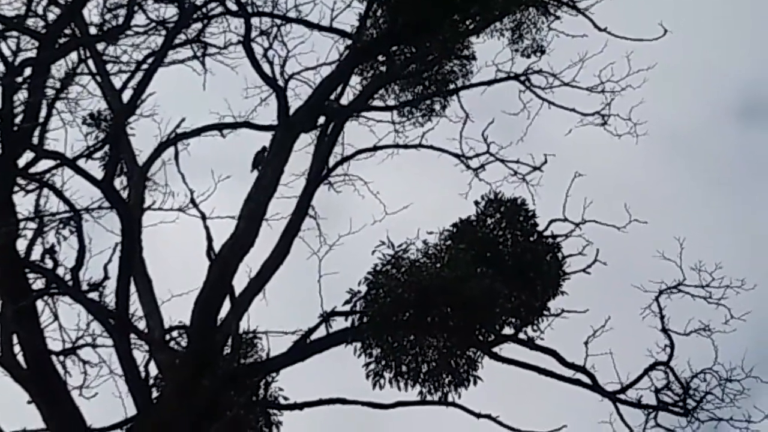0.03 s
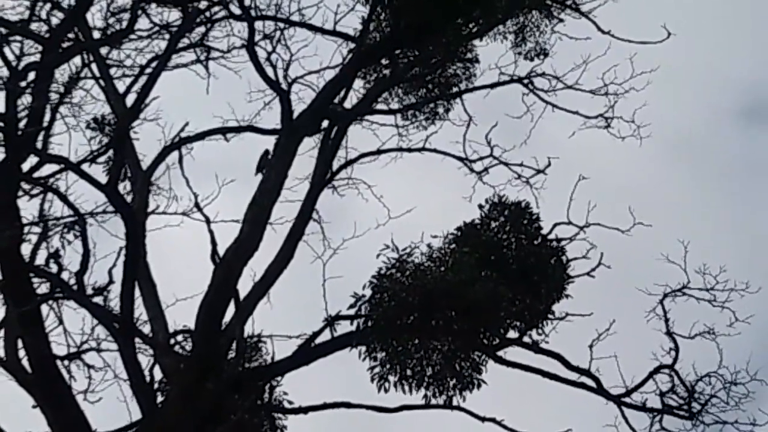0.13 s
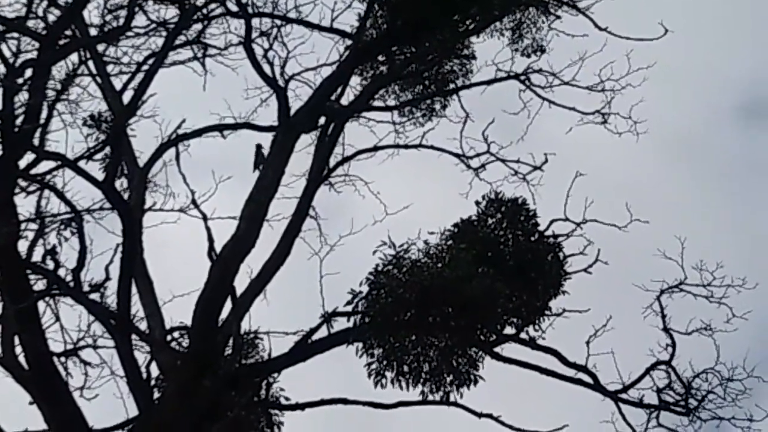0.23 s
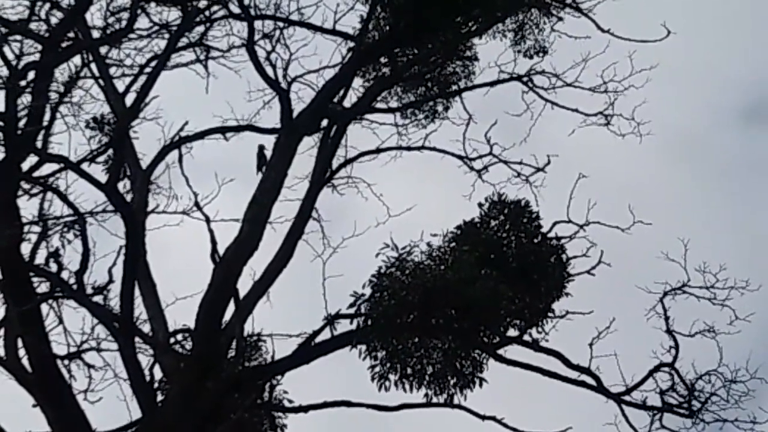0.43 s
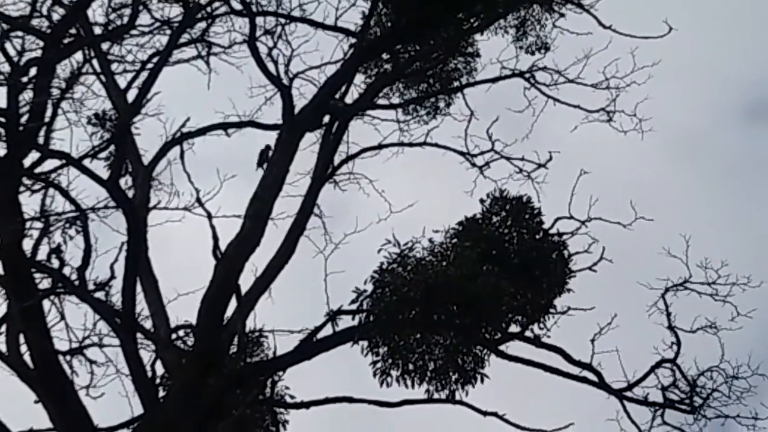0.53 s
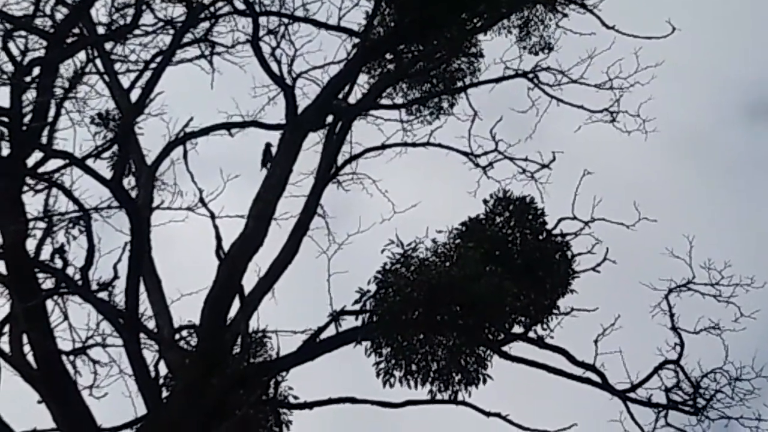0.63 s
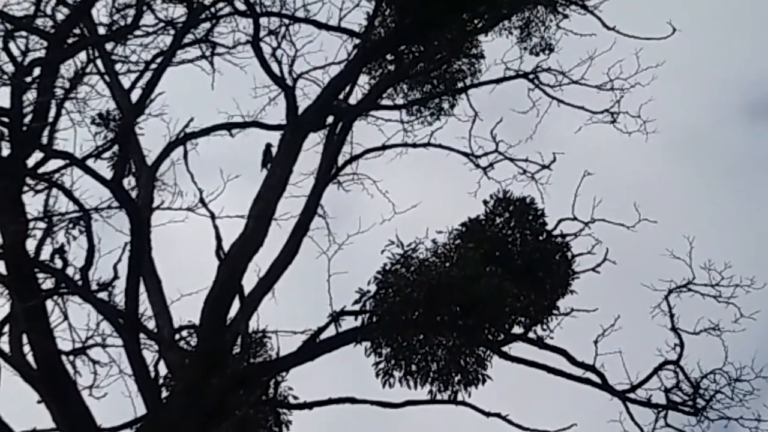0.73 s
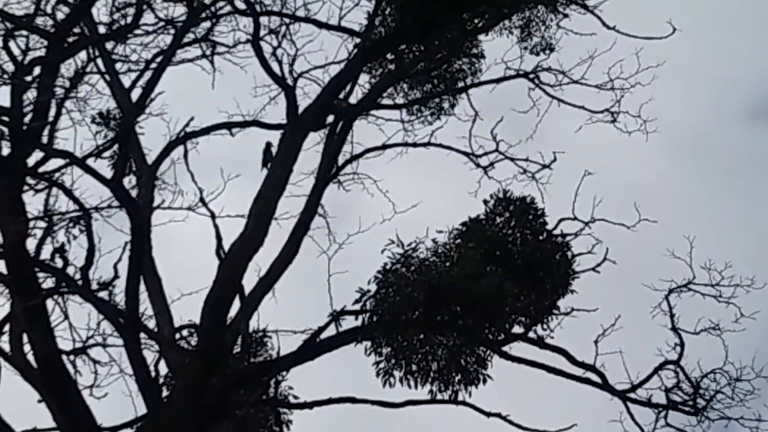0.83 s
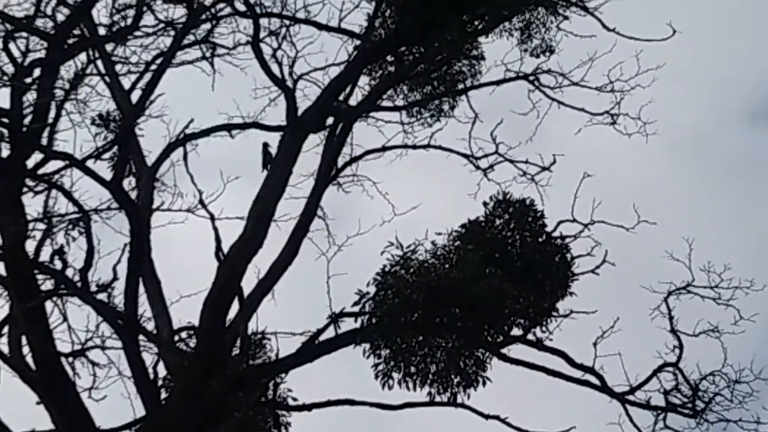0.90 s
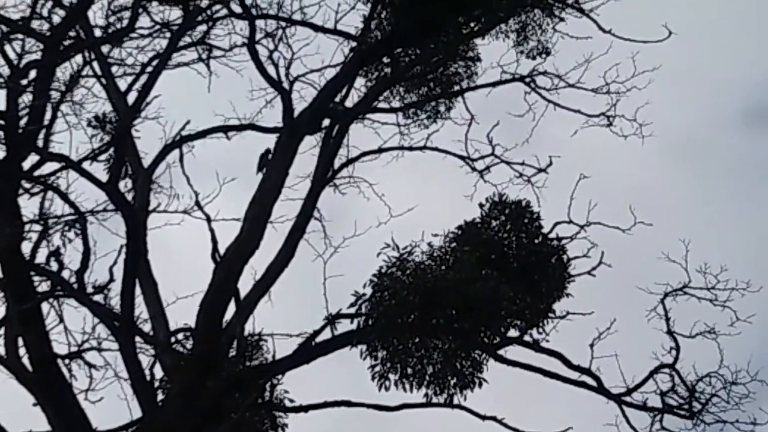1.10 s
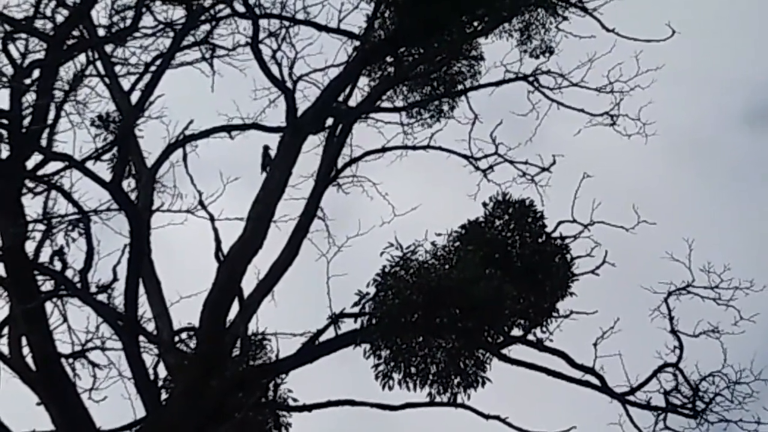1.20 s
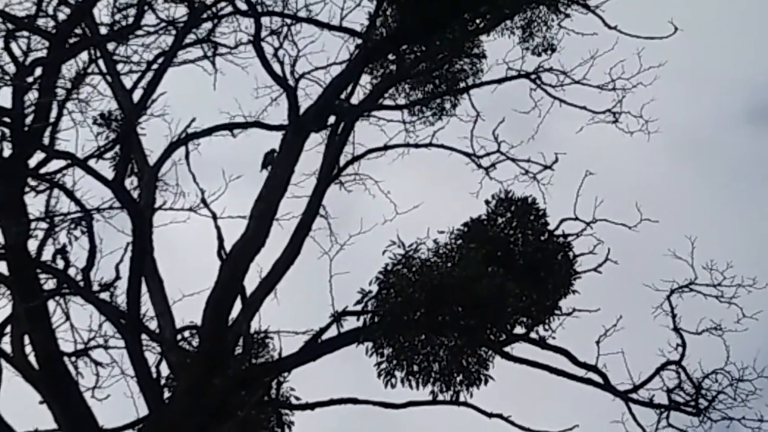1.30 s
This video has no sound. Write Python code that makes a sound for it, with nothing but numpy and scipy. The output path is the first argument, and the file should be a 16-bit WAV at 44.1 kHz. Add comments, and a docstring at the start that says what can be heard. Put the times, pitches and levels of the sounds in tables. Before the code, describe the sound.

Harsh bird chatter comes from high in a tree, starting just after a hard gust buffets the microphone. Weaker gusts keep rumbling over the notes, and thin, far chirps echo lightly among the trees.

```python
"""Over a distant outdoor wash and faint hiss, wind eddies buffet the microphone, once hard near 0.25 s.
With that gust a small, far bird begins its thin, arched chirps. From about 0.3 s a bird high in a bare
tree gives a harsh chatter, pulses and breath filtered by its throat: twelve rasping notes that slow
down and grow louder to the end. Both birds echo among the trees while weaker gusts rumble on."""
import sys
import numpy as np
from scipy import signal
from scipy.fft import rfft, irfft, next_fast_len
from scipy.io import wavfile
from scipy.ndimage import uniform_filter1d, map_coordinates

SR = 44100
rng = np.random.default_rng(int(sys.argv[2]) if len(sys.argv) > 2 else 0)


def transcribe(signal):
    """Save signal, clipped to [-1, 1], as a 16-bit WAV file at the path in sys.argv[1]."""
    frames = np.atleast_2d(signal).T
    limited = np.clip(frames, -1, 1)
    pcm = np.round(limited * 32767).astype(np.int16)
    wavfile.write(sys.argv[1], SR, pcm)


N = 59535


def amp(db):
    """Decibels to amplitude ratio."""
    return 10 ** (np.asarray(db) / 20)


def unit(x):
    """Normalisation to rms 1."""
    return x / np.sqrt(np.mean(x ** 2) + 1e-20)


def clock():
    """The time of each sample in seconds."""
    return np.arange(N) / SR


def along(points, hz):
    """Interpolation of (frequency_hz, value) points on a logarithmic frequency axis."""
    knots_hz, values = np.transpose(points)
    return np.interp(np.log(hz + 1), np.log(knots_hz + 1), values)


def wobble(rate):
    """A smooth random curve with `rate` knots a second."""
    return map_coordinates(rng.standard_normal(N // 8), [clock() * rate], mode="wrap")


def filtered(x, response):
    """Linear filtering: the spectrum of x times a frequency response."""
    size = next_fast_len(N + SR // 2)
    return irfft(rfft(x, size) * response(np.fft.rfftfreq(size, 1 / SR)), size)[:N]


def noise(spectrum):
    """Spectral shaping: white noise coloured and scaled to rms 1."""
    return unit(filtered(rng.standard_normal(N), lambda hz: amp(along(spectrum, hz))))


def evened(x, size=1500):
    """Division by the running rms over `size` samples removes the chance swells of noise."""
    envelope_power = uniform_filter1d(np.abs(signal.hilbert(x)) ** 2, size)
    return x / np.sqrt(np.abs(envelope_power) / 2 + 1e-9)


def chatter():
    """Source and filter: irregular pulses and breath noise excite three throat resonances."""
    # rasping notes: middle_s, level_db, upper_resonance_hz
    notes = [(.336, -61.5, 2240), (0.406, -56, 3230), (0.48, -55.5, 3262), (0.56, -55.5, 3170),
             (0.642, -54, 3090), (.731, -53.5, 3150), (0.829, -53.5, 3116), (0.932, -53, 2980),
             (1.036, -52, 3040), (1.148, -52, 3000), (1.256, -52.5, 2990), (1.366, -49, 3240)]
    # the two fixed throat resonances: centre_hz, width_hz, gain_db
    throat_modes = [(1660, 480, -4), (2375, 335, 2.2)]
    # spectral envelope of the voice: frequency_hz, gain_db
    voice_band = [(400, -43.5), (1000, -18), (1400, 3), (3300, -3), (3550, -4), (4400, -11), (5600, -11.5),
                  (7000, -26), (12000, -40)]
    pulse_hz, jitter, breath_share = 415, .3, .6
    flank_s, lengthen_per_s = .014, .35  # later notes last longer
    flutter_hz, flutter_db = 115, -.5
    upper_width_hz, upper_db = 235, -.5
    t, out = clock(), np.zeros(N)
    cycles = np.floor(np.cumsum(pulse_hz * np.exp(jitter * wobble(pulse_hz))) / SR)
    pulses = unit(np.diff(cycles, prepend=0))
    rasp = np.sqrt(1 - breath_share) * pulses + np.sqrt(breath_share) * rng.standard_normal(N)
    for middle_s, db, upper_hz in notes:
        modes = list(throat_modes) + [(upper_hz, upper_width_hz, upper_db)]

        def throat(f):
            """The resonances add in power under the voice's spectral envelope."""
            power = sum(amp(gain_db) ** 2 / (1 + 2 * ((f - hz) / width_hz) ** 2) ** 2
                        for hz, width_hz, gain_db in modes)
            return amp(along(voice_band, f)) * np.sqrt(power)

        width_s = flank_s * (1 + lengthen_per_s * (middle_s - notes[0][0]))
        swell = np.exp(-((t - middle_s) / width_s) ** 2 / 2)
        flutter_phase = 2 * np.pi * flutter_hz * (t - middle_s) + rng.uniform(0, 2 * np.pi)
        flutter = amp(flutter_db * np.cos(flutter_phase))
        out += amp(db) * swell * flutter * evened(unit(filtered(rasp, throat)))
    return out


def chirps():
    """Modulation by low-pass noise spreads each gliding whistle into a hoarse, narrow band."""
    # the small bird's glides: middle_s, length_s, start_hz, end_hz, level_db
    glides = [(0.262, 0.063, 3220, 3040, -74.5), (0.424, .06, 4000, 3430, -71),
              (0.631, 0.046, 5400, 5350, -77), (0.792, 0.066, 4500, 5430, -79),
              (0.831, 0.039, 3900, 3370, -65), (1.064, 0.068, 3716, 4570, -78.5),
              (1.108, 0.051, 4040, 3414, -67.5), (1.294, 0.08, 3870, 4800, -72),
              (1.327, 0.058, 4030, 3500, -68)]
    arch_hz, spread_hz = 120, 300
    t, out = clock(), np.zeros(N)
    for middle_s, length_s, start_hz, end_hz, db in glides:
        progress = np.clip((t - middle_s) / length_s + .5, 0, 1)
        arch = np.sin(np.pi * progress)
        pitch_hz = start_hz + (end_hz - start_hz) * progress + arch_hz * arch
        hoarse = unit(filtered(rng.standard_normal(N), lambda f: np.exp(-(f / spread_hz) ** 2 / 2)))
        out += amp(db) * arch * hoarse * np.sin(2 * np.pi * np.cumsum(pitch_hz) / SR)
    return out


def tree_echo(x):
    """Reverberation: scattering from trunks and branches leaves an exponentially decaying tail."""
    # time to decay by 60 dB: frequency_hz, decay_s
    decay_times = [(200, .5), (2500, 1), (8000, 0.9)]
    hz, t, spectra = signal.stft(rng.standard_normal(SR), SR, nperseg=256)
    decay = amp(-60 * t / along(decay_times, hz)[:, None])
    tail = signal.istft(spectra * decay, SR, nperseg=256)[1]
    return signal.fftconvolve(x, tail / np.linalg.norm(tail))[:N]


def wind():
    """Turbulence: the rumble rises in pitch as eddies pass faster; a finer swirl leads strong gusts."""
    # course of the wind: time_s, strength_db, rumble_centre_hz
    gusts = [(0, -46, 104), (0.096, -33, 104.8), (.13, -46.5, 120.6), (.178, -32, 80.13),
             (.205, -39, 114.1), (0.227, -20.5, 175), (0.271, -21.5, 91.9), (.315, -37.5, 79.1),
             (0.349, -28, 89.4), (0.388, -37.5, 99.17), (0.462, -40.5, 104.1), (0.526, -31.5, 85.16),
             (0.587, -45.5, 95.1), (0.62, -25, 76.4), (0.722, -48, 83.68), (0.798, -45, 95.6),
             (0.833, -41.5, 113.3), (.875, -37, 105.1), (.96, -29, 108.5), (1.052, -49, 90.45),
             (1.10, -36.5, 114.5), (1.13, -40.5, 101.3), (1.175, -34.5, 79.64), (1.235, -42.5, 78),
             (1.35, -44, 110.8)]
    # large eddies at the mean speed: frequency_hz, density_db
    rumble_spectrum = [(25, -35), (45, -4.5), (70, 5), (100, 3.5), (140, -3.5), (200, -17), (280, -26.5),
                       (450, -53), (1000, -86.5)]
    # finer eddies: frequency_hz, density_db
    swirl_spectrum = [(60, -16), (150, 15), (240, -3), (320, -18.5), (500, -17.5), (750, -21.5),
                      (1100, -38), (2500, -82.5)]
    swirl_offset_db, swirl_growth, swirl_lead_s = -15.5, 1.59, .0059
    times_s, db, centre_hz = np.transpose(gusts)
    strength_db = np.interp(clock(), times_s, db)
    front_db = np.interp(clock() + swirl_lead_s, times_s, db)
    relative_speed = np.interp(clock(), times_s, centre_hz) / centre_hz.mean()
    eddies = evened(noise(rumble_spectrum), size=900)
    rumble = map_coordinates(eddies, [np.cumsum(relative_speed)], mode="mirror")
    swirl = evened(noise(swirl_spectrum), size=900)
    swirl_db = swirl_offset_db + db.mean() + swirl_growth * (front_db - db.mean())
    return amp(strength_db) * rumble + amp(swirl_db) * swirl


def eddy_thumps():
    """Single eddies land as dull pressure pulses, high-pass filtered by the microphone port."""
    # eddy impacts: time_s, peak_db, half_width_s
    impacts = [(0.2228, -20, 0.00078), (0.2365, -9, 0.0012), (0.2551, -6.5, 0.0023), (0.516, -35, .0012),
               (0.622, -24.5, 0.0019), (0.635, -29.5, 0.0017), (.680, -25.5, 0.0027), (.896, -26.5, 0.0019),
               (0.915, -28.5, 0.0016), (0.947, -28, 0.0024), (0.963, -21.5, 0.0022), (1.078, -29, 0.0024),
               (1.106, -24.5, 0.0029), (1.31, -31.5, .0015)]
    port_hz = 85
    port = signal.butter(3, port_hz, "high", fs=SR, output="sos")
    out = np.zeros(N)
    for time_s, db, half_width_s in impacts:
        pressure = 1 / (1 + ((clock() - time_s) / half_width_s) ** 2)
        thump = signal.sosfilt(port, pressure)
        out -= amp(db) * thump / np.abs(thump).max()
    return out


def background():
    """Noise floor: a slowly rising, distant outdoor wash and the microphone's steady self-noise."""
    # colour of the wash: frequency_hz, density_db
    wash_spectrum = [(100, -15), (400, -7.5), (700, -2), (1050, -3.5), (1500, -8.5), (2300, -17),
                     (3200, -28), (5000, -31.5), (9000, -47.5)]
    # rise of the wash: time_s, level_db
    wash_levels = [(0, -61.5), (.4, -58.5), (0.999, -57.5), (1.35, -57)]
    # colour of the self-noise: frequency_hz, density_db
    hiss_spectrum = [(1000, -1), (4500, -10), (6500, -4), (8000, -1.5), (10000, 0.5), (15500, -0.5)]
    hiss_db = -70
    wash_db = np.interp(clock(), *np.transpose(wash_levels))
    return amp(wash_db) * noise(wash_spectrum) + amp(hiss_db) * noise(hiss_spectrum)


def scene():
    """Superposition of both birds, their echoes, the wind and the background."""
    near_echo_db, far_echo_db = -6, -7
    near, far = chatter(), chirps()
    echoes = tree_echo(amp(near_echo_db) * near + amp(far_echo_db) * far)
    return (near + far + echoes + wind() + eddy_thumps() + background())[None]


def record(dry):
    """Band limiting: a wind filter thins the deep bass, and nothing passes above the upper limit."""
    # response of the wind filter: frequency_hz, gain_db
    low_cut = [(20, -27.5), (35, -15.5), (50, -6.5), (70, -1.5), (90, 0)]
    limit_hz, fade_s = 15730, .003
    t = clock()
    fades = np.clip(np.minimum(t, t[-1] - t) / fade_s, 0, 1)
    return filtered(dry[0] * fades, lambda hz: amp(along(low_cut, hz)) * (hz < limit_hz))[None]


dry = scene()
out = record(dry)
transcribe(out)
```